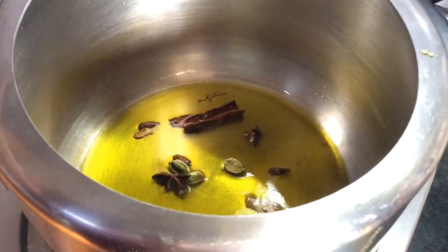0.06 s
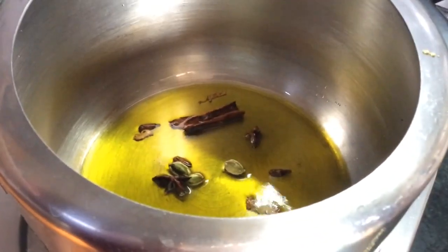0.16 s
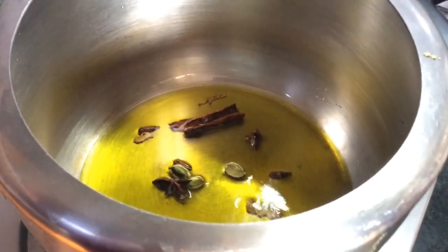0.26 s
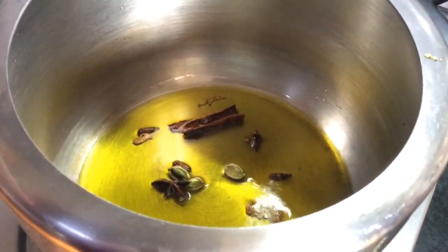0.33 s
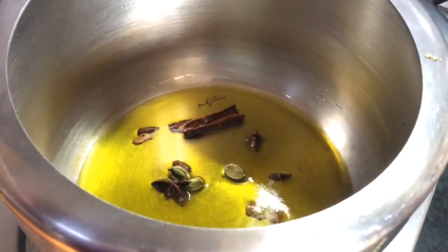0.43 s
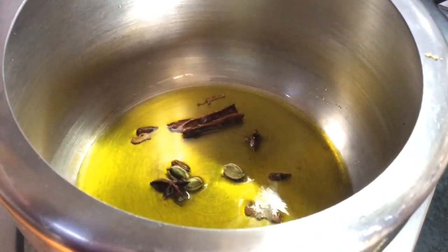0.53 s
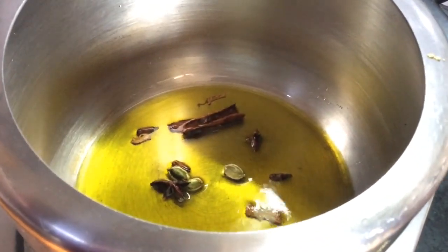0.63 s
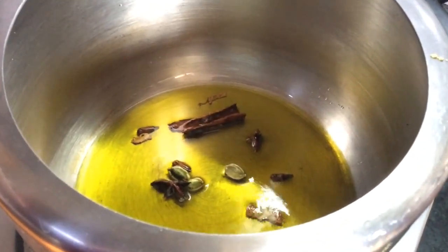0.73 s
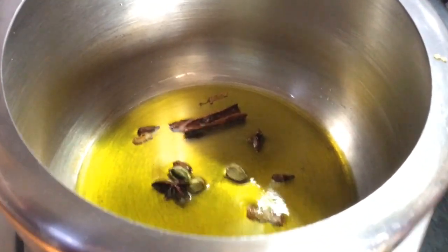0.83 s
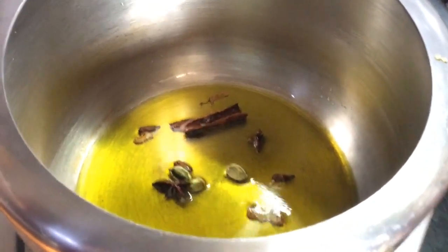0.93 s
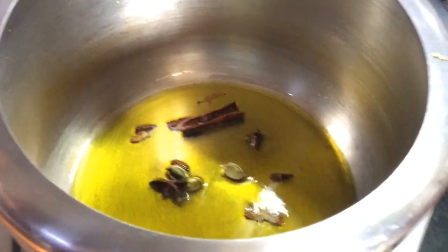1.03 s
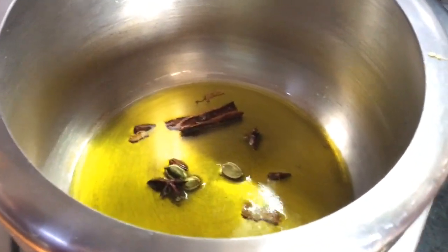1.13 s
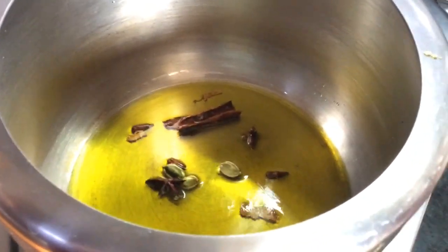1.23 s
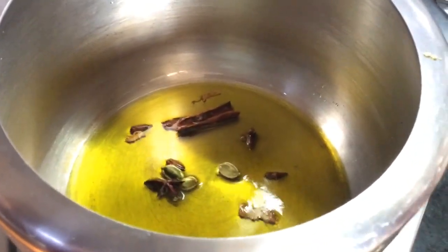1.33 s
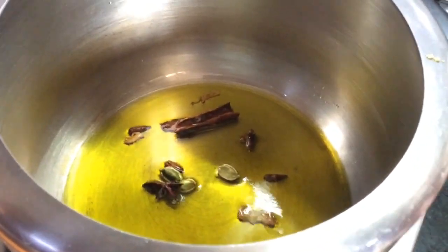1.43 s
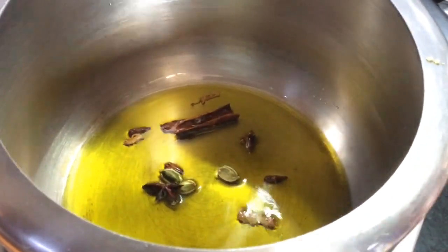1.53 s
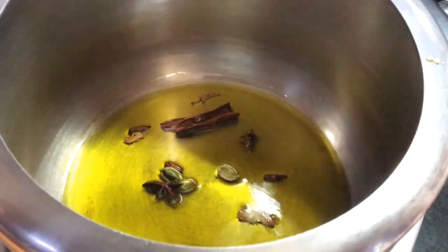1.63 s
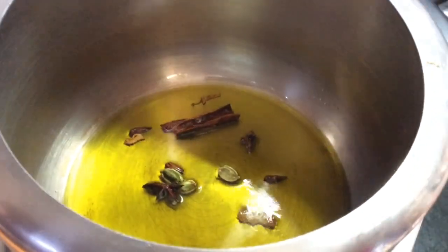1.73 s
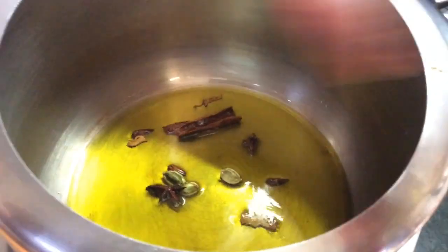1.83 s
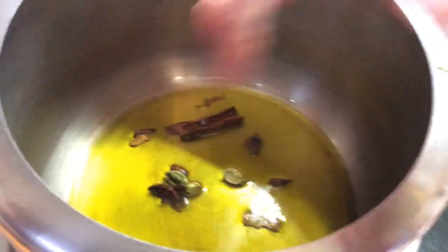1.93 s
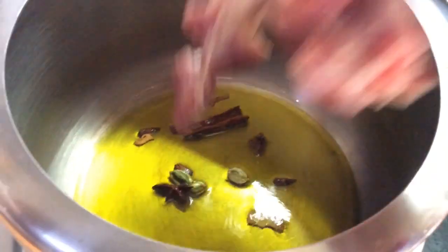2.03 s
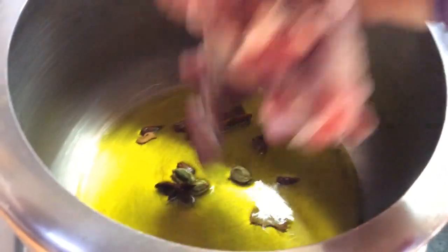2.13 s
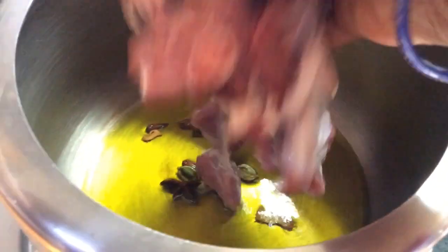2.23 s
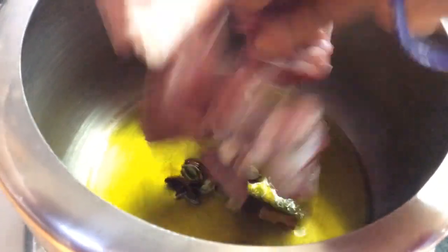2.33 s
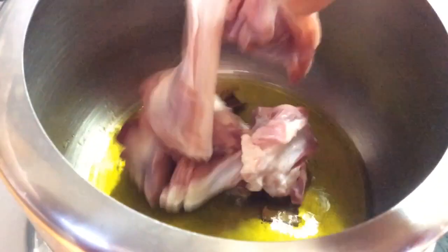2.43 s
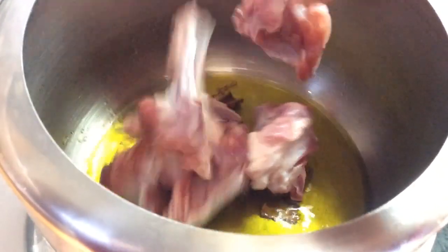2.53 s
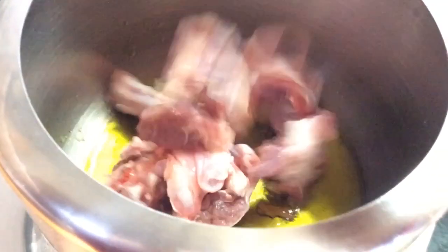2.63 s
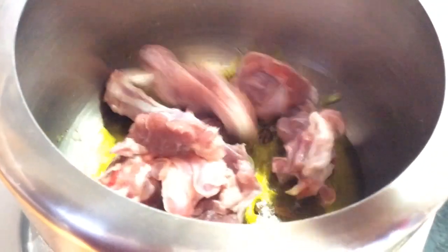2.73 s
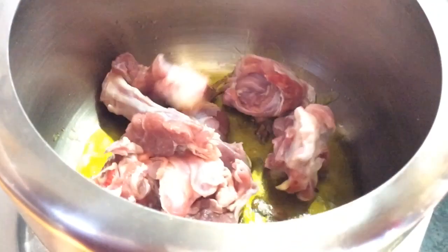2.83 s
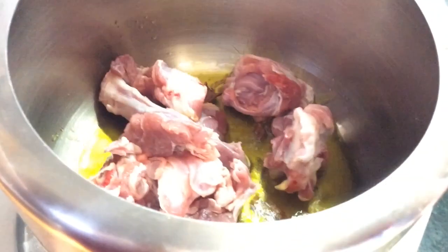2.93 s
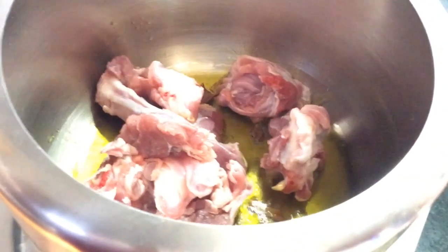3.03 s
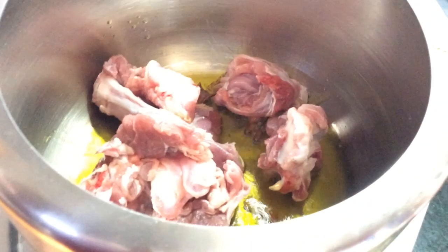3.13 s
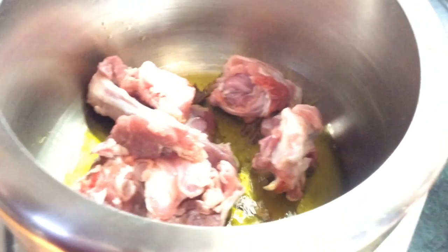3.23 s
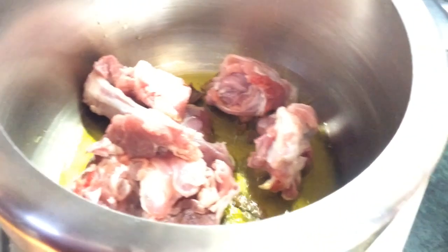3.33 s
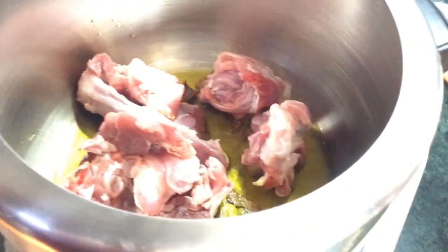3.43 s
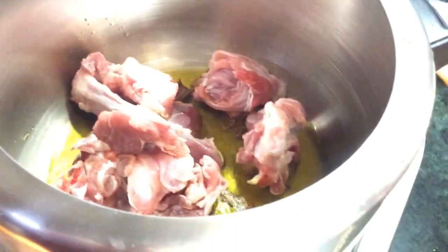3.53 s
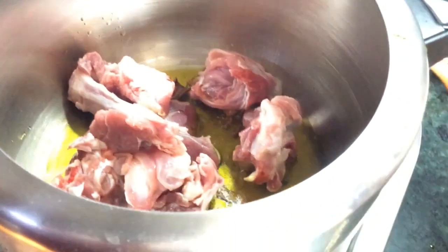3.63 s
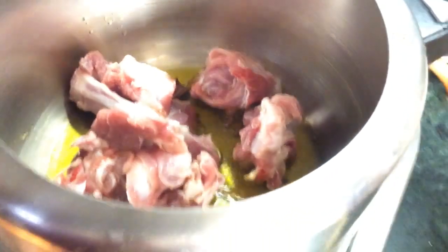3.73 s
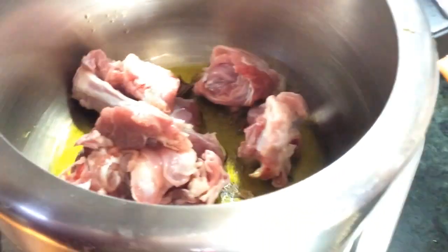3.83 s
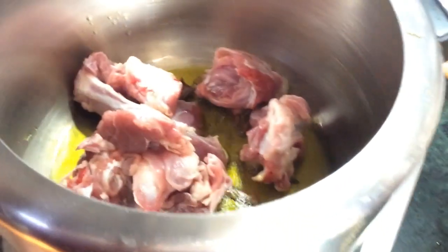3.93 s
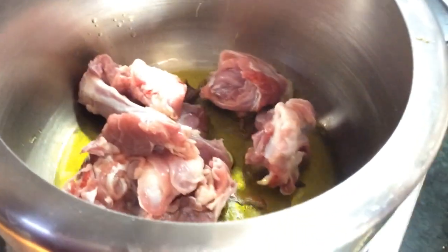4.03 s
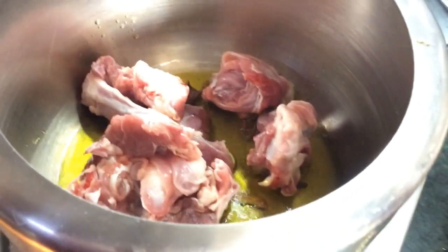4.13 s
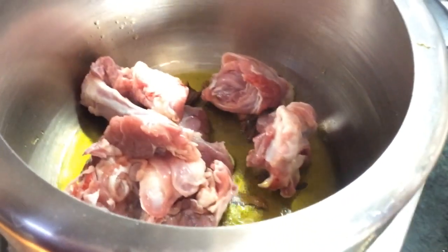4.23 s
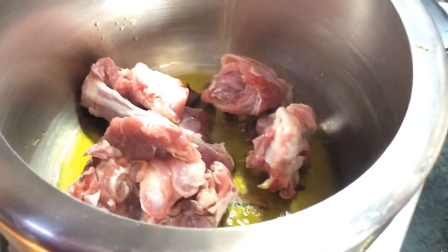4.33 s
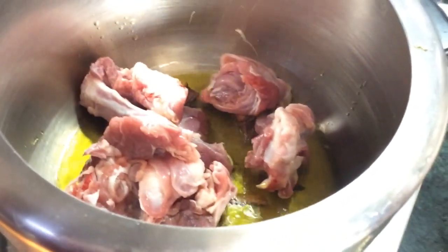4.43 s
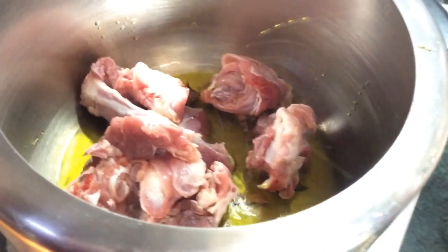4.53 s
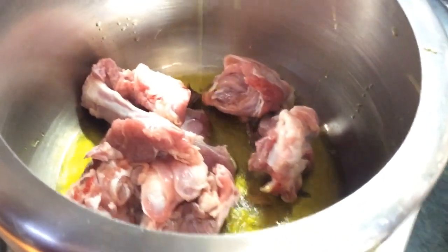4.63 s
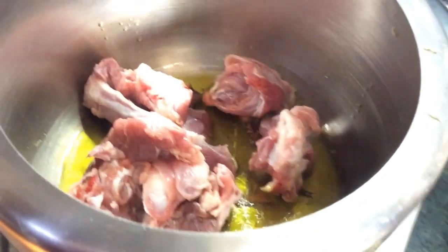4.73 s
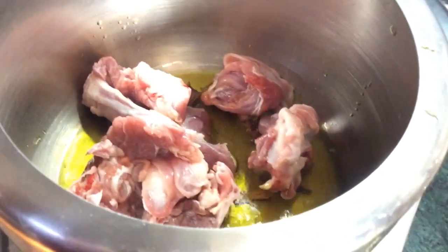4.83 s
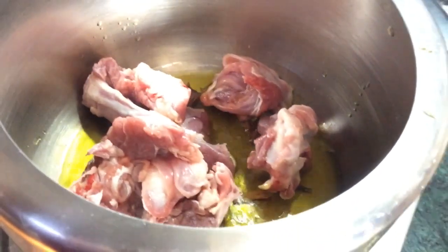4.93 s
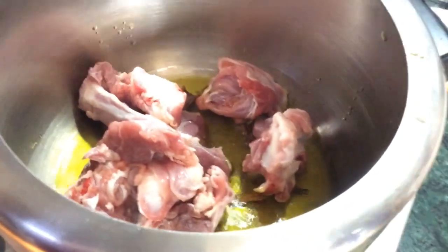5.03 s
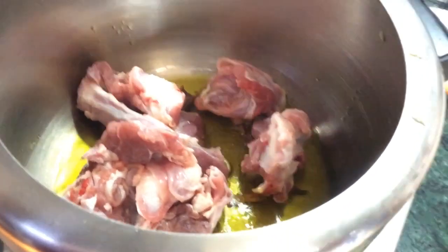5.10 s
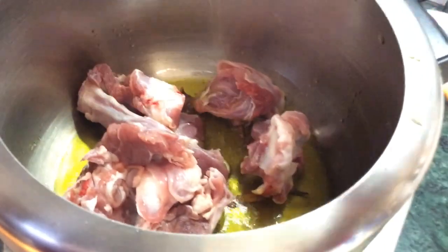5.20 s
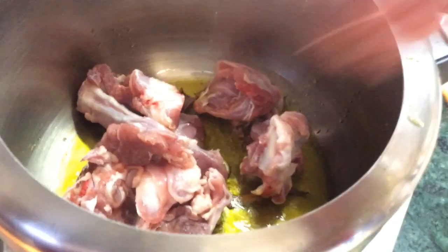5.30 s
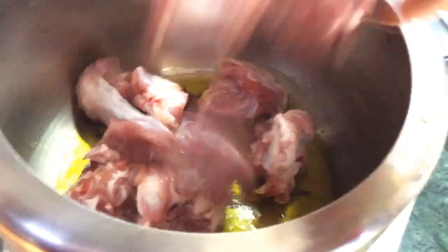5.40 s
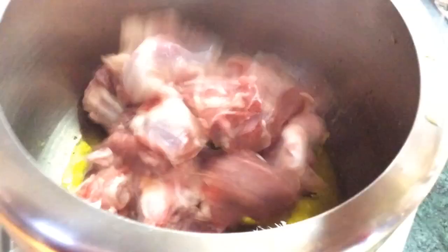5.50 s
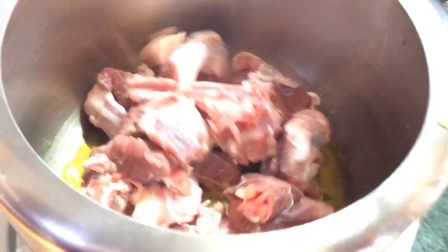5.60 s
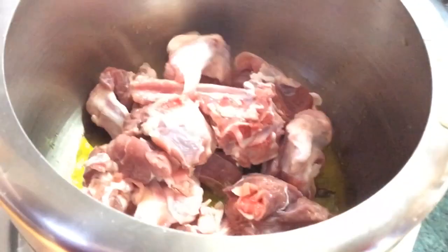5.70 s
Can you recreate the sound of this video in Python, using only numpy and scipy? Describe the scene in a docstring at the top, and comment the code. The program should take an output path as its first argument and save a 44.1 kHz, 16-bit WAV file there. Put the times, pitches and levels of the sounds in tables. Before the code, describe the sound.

Very close mono microphone over a pressure cooker: over two seconds of faint simmer, tiny ticks and low room rumble, one bright bangle clink, then meat plops in with a steamy, fizzy roar. The sizzle eases slightly while sharp oil pops grow more frequent and distort; more meat stirs it up again.

```python
"""Raw meat drops into hot oil in an open pressure cooker, close to the microphone. The wet meat lands and its
water flashes to steam: swarms of short ringing bubbles make a dense sizzle, with crackles and loud pops that
ring in the pot, and hissing jets; together they overload the microphone. Before that, whole spices tick in the
oil and a bangle clinks as a set of fading sines. Behind it all, filtered noise and a wavering low hum make the
kitchen."""
import sys
import numpy as np
from scipy import signal
from scipy.fft import rfft, irfft
from scipy.io import wavfile
from scipy.ndimage import uniform_filter1d

SR = 44100
rng = np.random.default_rng(int(sys.argv[2]) if len(sys.argv) > 2 else 0)


def bounce(signal):
    """Save signal as a 16-bit WAV file at the path given by the first command-line argument."""
    frames = np.transpose(np.atleast_2d(signal))
    limited = np.clip(frames, -1, 1)
    pcm = np.round(limited * 32767).astype(np.int16)
    wavfile.write(sys.argv[1], SR, pcm)


N = 254016
TIME = np.arange(N) / SR  # [s]

# wet meat hitting the pot floor, levels before the meat gain in scene():
# (time [s], thump level [dB], thump pitch [Hz], level of the gush of bubbles [dB])
MEAT_LANDINGS = [(2.4478, -16, 270, -27), (2.675, -8.5, 350, -36), (2.762, -20, 396, -24),
                 (5.58, -35, 400, -17.5), (5.6555, -10.5, 334, -31)]
# colour of the tiny bubbles and droplets: (frequency [Hz], relative level per Hz [dB])
FIZZ_COLOUR = [(300, -28), (1100, -7), (2000, 0.5), (3300, 2.5), (4300, -1.5), (5500, 0.5), (7000, -5),
               (9000, -10.5), (11000, -20.5), (13000, -29), (16000, -47)]
# colour of the middle-sized bubbles: (frequency [Hz], relative level per Hz [dB])
CRACKLE_COLOUR = [(200, -46.5), (450, -1.5), (800, -18.5), (1150, -1), (1400, -10), (1800, 4), (2300, -2),
                  (3000, -5.5), (4200, -2), (6500, -68), (12000, -53)]


def amp(db):
    """Turns decibels into a gain."""
    return 10 ** (np.asarray(db) / 20)


def evened(x):
    """Scales a sound to an average (rms) strength of 1."""
    return x / np.sqrt(np.mean(x ** 2) + 1e-20)


def add(mix, start_s, sound):
    """Mixes a sound in at the given time, in place."""
    part = mix[max(round(start_s * SR), 0):][:len(sound)]
    part += sound[:len(part)]


def colour(x, points, size=4096):
    """Gives a sound the listed spectrum; the filter never looks ahead, so clicks keep sharp fronts."""
    hz, db = np.transpose(points)
    bin_hz = abs(np.fft.fftfreq(size, 1 / SR)) + 1
    log_gain = np.log(amp(np.interp(np.log(bin_hz), np.log(hz), db)))
    # this phase packs the filter's energy as early as possible
    taps = np.fft.ifft(np.exp(np.conj(signal.hilbert(log_gain)))).real
    return signal.oaconvolve(x, taps[:size // 2])[:N]


def low_cut(x, hz):
    """Takes out the bass, as a small source radiates little of it."""
    return signal.sosfilt(signal.butter(2, hz, "high", fs=SR, output="sos"), x)


def ring(hz, fade_s, rise_s=1e-5):
    """A sine that swells and dies away; both times are time constants."""
    t = TIME[:int(8 * fade_s * SR) + 2]
    return np.sin(2 * np.pi * hz * t) * np.exp(-t / fade_s) * (1 - np.exp(-t / rise_s))


def wander(hz):
    """A random curve of rms 1 that wavers at rates from a tenth of hz to about hz."""
    f = np.fft.rfftfreq(N, 1 / SR)
    weights = (f > hz / 10) / (1 + (f / hz) ** 2)
    return evened(irfft(rfft(rng.standard_normal(N)) * weights, N))


def bursts(per_s, spread_db, clump_db, clump_hz):
    """Random clicks, mostly small and a few large, whose strength rises and falls in clumps."""
    sizes = amp(spread_db * np.minimum(rng.exponential(1, N), np.pi))
    clicks = sizes * rng.choice([-1, 1], N) * (rng.random(N) < per_s / SR)
    return evened(clicks * amp(clump_db * np.tanh(wander(clump_hz))))


def bubbles(per_s, spread_db, clump_db, low_hz, high_hz, cycles, count=20):
    """Swarms of bubbles in many sizes, each ringing a few cycles at its own pitch."""
    out = np.zeros(N)
    for hz in np.geomspace(low_hz, high_hz, count):
        bubble = ring(hz, cycles / hz, 0.12 / hz)
        clicks = bursts(per_s / count, spread_db, clump_db, 26)
        out += np.sqrt(hz) * evened(signal.oaconvolve(clicks, bubble)[:N])
    return evened(out)


def echoes(t60, first_s):
    """Sparse reflections of random sign that fall 60 dB in t60 seconds; energy 1."""
    t = TIME[:SR // 2]
    hits = rng.choice([-1, 1], len(t)) * (rng.random(len(t)) < 1 / 10)
    taps = hits * (t > first_s) * 1000 ** (-t / t60)
    taps = signal.lfilter(*signal.butter(1, [300, 7000], "band", fs=SR), taps)
    return taps / np.linalg.norm(taps)


def pot(x, wall_db, mode_db):
    """Sound bounces between the steel walls, rings the pot and spills into the kitchen."""
    # resonances of the pot and the air in it; mode_db is added to each level:
    # (pitch [Hz], time to fall 60 dB [s], level [dB])
    resonances = [(446, 0.18, -20.5), (514.5, 0.02, -14), (830, 0.35, -29), (1131.7, 0.074, -10.5),
                  (1163, 0.083, -15.5), (1874, 0.034, -38.5), (2076, 0.017, -17), (2370, 0.062, -60),
                  (3700, 0.066, -47.5)]
    out = x + amp(wall_db - 8.5) * signal.oaconvolve(x, echoes(0.22, 0.019))[:N]  # the kitchen
    # bubbles burst all over the pot floor, and each of five places has its own wall echoes
    for angle in np.linspace(0, np.pi, num=5, endpoint=False):
        # the places take turns; the root keeps their total power at 1
        share = np.cos(2 * np.pi * 11 * TIME + angle) ** 4 / np.sqrt(175 / 128)
        out += amp(wall_db) * signal.oaconvolve(share * x, echoes(0.062, 0.001163))[:N]
    body = np.zeros(SR // 2)
    for hz, t60, db in resonances:
        mode = ring(hz, t60 / np.log(1000), 0.0035)
        add(body, 0, amp(db + mode_db) * mode / np.linalg.norm(mode))
    return out + signal.oaconvolve(x, body)[:N]


def sizzle():
    """Water boils off the meat: tiny bubbles fizz, larger ones crackle, trapped ones knock on the floor."""
    # how hard the water boils, strongest soon after the first pieces land: (time [s], level [dB])
    boil_curve = [(2.32, -51), (2.41, -40.5), (2.47, -35), (2.76, -26.5), (2.97, -25), (3.28, -28),
                  (3.69, -33), (4.06, -30), (4.45, -33.5), (4.87, -30), (5.43, -34.5), (5.63, -29),
                  (5.76, -32.5)]
    # colour of the bubbles trapped under the meat: (frequency [Hz], relative level per Hz [dB])
    knock_colour = [(40, -29), (200, -51), (320, -3.5), (460, 3), (650, -4), (900, -5), (1500, -9),
                    (4000, -34)]
    wet_from_s, wet_rise_s = 2.315, 0.017  # first touch of meat and oil, time to catch
    first_contact, spread_s = 0.13, 0.025  # share in the oil before landing, time constant of spreading
    stir_boost_db, stir_s = 6.5, 0.03  # each landing stirs up the larger bubbles: boost, time constant
    steady_boil_db = -32
    crackle_db, crackle_follows = -29, 0.39  # level at a steady boil, share of the boil's swing
    knock_db, knock_follows = -41.5, 0.61
    knock_growth_db_per_s = 1.85  # bubbles trapped under the meat grow as it heats

    boil_db = np.interp(TIME, *np.transpose(boil_curve))
    swing_db = boil_db - steady_boil_db
    landed_s = np.maximum(TIME - MEAT_LANDINGS[0][0], 0)
    contact = 1 - (1 - first_contact) * np.exp(-landed_s / spread_s)
    stir_db = stir_boost_db * sum((TIME > s) * np.exp(-abs(TIME - s) / stir_s) for s, *_ in MEAT_LANDINGS)
    crackle_gain = contact * amp(crackle_db + crackle_follows * swing_db + 0.87 * stir_db)
    growth_db = knock_growth_db_per_s * landed_s
    knock_gain = contact * amp(knock_db + knock_follows * swing_db + growth_db + stir_db)

    tiny = bubbles(4200, 4.2, 3.5, 1500, 15000, 1.7, count=28)
    fizz = evened(colour(tiny, FIZZ_COLOUR)) * amp(0.73 * wander(120))
    ticks = colour(bursts(150, 5.6, 8.5, 16), CRACKLE_COLOUR)  # the odd film that tears with a dry tick
    larger = bubbles(1100, 3.9, 6.8, 1150, 6030, 1.7)
    crackle = evened(colour(larger, CRACKLE_COLOUR)) * amp(1.43 * wander(59))
    crackle += amp(-3.5) * evened(ticks)
    knocks = colour(bursts(150, 3.7, 2.6, 25), knock_colour)

    out = amp(boil_db + 3.0) * evened(pot(fizz, -5.5, -31))  # the fizz is 3 dB above the boil curve
    out += crackle_gain * evened(pot(crackle, -11.5, -11))
    out += knock_gain * evened(pot(knocks, -13, -32.5))
    return low_cut(out, 270) * np.clip((TIME - wet_from_s) / wet_rise_s, 0, 1)


def pops():
    """Each large bubble snaps, rings, pushes on the pot floor and throws a brief spray of droplets."""
    # the loud steam bubbles, levels before the gains below and in scene():
    # (time [s], bubble pitch [Hz], ring time constant [s], bubble level [dB],
    #  level of the film's snap [dB], level of the thud on the pot floor [dB])
    loud_pops = [(2.448, 1304, 0.0034, -4, -16.5, -14.5), (2.5625, 2880, .003, -12, -11, -34),
                 (2.7741, 1904, 0.0026, -6, -18, -40), (2.7935, 1780, .0036, -7.5, -7.5, -7.5),
                 (2.819, 1800, .0007, 3, -15, -36), (2.8656, 1870, 0.0041, -7.5, -11, -35),
                 (3.0235, 1920, 0.0017, -8, -22, -17), (3.0938, 1830, 0.002, -3, -5, -39),
                 (3.1311, 2760, 0.00024, 10, -10, -15), (3.159, 3640, .0004, -7, 1, -12),
                 (3.2029, 1540, 0.00063, -4.5, -29, -4.5), (3.4157, 1910, 0.0021, 1, -2, -15),
                 (3.4929, 1854, 0.00093, 6, -8.5, -9), (3.5948, 1880, 0.00087, -0.5, -3, -9.5),
                 (3.658, 2950, 0.0018, -6.5, -3, -34), (3.8867, 5430, 0.00065, 2.5, 2.5, -17.5),
                 (4.014, 3580, 0.00055, -8, -15, -6.5), (4.026, 1890, 0.0016, -4.5, -16, -26),
                 (4.0404, 1870, 0.001, 1.5, -17, -37), (4.056, 5300, .0003, 4, 2, -14),
                 (4.1052, 4000, .00035, 3.5, -23, -32), (4.156, 2590, 0.0012, -0.5, -24, -39),
                 (4.2124, 1790, .003, -11.5, -11, -10), (4.348, 2020, 0.00053, 8, 4, -11.5),
                 (4.387, 1790, .0018, 5.5, -5, -12), (4.4114, 1840, 0.00055, 3.5, -20, 0),
                 (4.4182, 1830, 0.0015, 0, -21, -5.5), (4.5021, 3770, .0004, 1, -4, -12),
                 (4.5436, 1810, 0.0005, 11, -2.5, 1.5), (4.5538, 2720, 0.00026, 16, -1, -31),
                 (4.6072, 2830, 0.00038, 4, -14, -5.5), (4.701, 4090, 0.00027, 16.5, -6.5, -35),
                 (4.7427, 2530, 0.0014, -3, -11.5, -40), (4.8136, 1940, .0004, -14, -10, -6.5),
                 (4.9171, 3720, .0006, 6, 1, -7.5), (4.9406, 3030, .0012, 0.5, -13, -6),
                 (5.0036, 2140, 0.00037, 6.5, -10, -27), (5.02, 2330, 0.0021, -6, -13, -18),
                 (5.0443, 1630, 0.0018, -6.5, -11, -6), (5.0497, 1170, 0.0012, -4.5, -3, -7),
                 (5.0739, 1970, .0008, -0.5, -8, -17.5), (5.196, 2660, 0.0021, -4.5, -7, -19),
                 (5.2149, 2340, 0.00057, 12, -15, -13), (5.2853, 1750, 0.00025, 14.5, -2.5, -2.5),
                 (5.33, 3600, 0.00027, 8.5, -3, -0.5), (5.367, 2780, 0.0013, -4.5, -9, -18),
                 (5.3816, 5460, 0.00037, -0.5, -6.5, -7.5), (5.3947, 2020, 0.0008, 2.5, -12, -24),
                 (5.4084, 1810, .0017, -7.5, -26, -23), (5.4669, 2770, 0.0018, -9.5, -27, -15),
                 (5.5234, 1920, 0.0011, 6, -18, -5.5), (5.5839, 1790, 0.0046, -5.5, -21, -3.5),
                 (5.6179, 1800, 0.00045, 10, -11, -9), (5.6568, 1540, 0.00056, 7.5, -7, 0.5),
                 (5.6929, 2140, 0.0019, 0, -14, -38)]
    out, thuds, spray = np.zeros((3, N))
    chances = rng.uniform(-1, 1, (200, 2))  # each pop's own snap and thud pitch
    for row, (snap_chance, thud_chance) in zip(list(loud_pops) + small_pops(), chances):
        s, hz, fade_s, bubble_db, snap_db, thud_db = row
        snap_hz = 4600 * (1 + 0.19 * snap_chance)
        thud_hz = 590 * (1 + 0.11 * thud_chance)
        add(out, s, -amp(bubble_db) * ring(hz, fade_s, 0.00026))
        add(out, s, -amp(snap_db + 3.0) * ring(snap_hz, 0.00037, 0.0001))
        add(out, s, -amp(snap_db - 13) * ring(9700, 0.00009))  # the sharp edge of the snap
        add(thuds, s, -amp(thud_db - 1.0) * ring(thud_hz, 0.0012, 0.0001))
        add(spray, s, amp(snap_db) * np.exp(-TIME[:SR // 10] / 0.0095))
    droplets = amp(-19.5) * spray * evened(colour(bursts(2500, 2.6, 3.0, 87), FIZZ_COLOUR))
    return pot(low_cut(out + low_cut(thuds, 470) + droplets, 140), -9.5, -4.0)


def small_pops(count=120):
    """Smaller bubbles burst at random, more often once the meat has settled; rows as in loud_pops."""
    slots_per_s, from_s, settle_s = 17, 2.5, 1.2  # chances to pop, first chance, time constant of settling
    middle_hz, spread_octaves, ring_cycles = 2520, 0.57, 2.3  # spread each way; cycles per time constant
    bubble_db, snap_db, thud_db, spread_db = -7, -16, -19.5, 2.5
    rows = []
    for k, (when, keep, *chances) in enumerate(rng.random((count, 6))):
        s = from_s + (k + when) / slots_per_s
        size, bubble, snap, thud = 2 * np.array(chances) - 1
        hz = middle_hz * 2 ** (-spread_octaves * size)  # larger bubbles ring lower
        if s < TIME[-1] and keep > np.exp((from_s - s) / settle_s):
            rows.append((s, hz, ring_cycles / hz, bubble_db + spread_db * bubble,
                         snap_db + spread_db * snap, thud_db + 2 * spread_db * thud))
    return rows


def landings():
    """Soft meat gives a dull push on the pot floor, and its wet side boils up at once."""
    thumps, gush = np.zeros((2, N))
    for s, thump_db, hz, gush_db in MEAT_LANDINGS:
        add(thumps, s, amp(thump_db) * ring(hz, 0.0019, 0.00088))
        add(gush, s, amp(gush_db) * np.exp(-TIME / 0.062) * (1 - np.exp(-TIME / 0.00081)))
    foam = evened(colour(bubbles(6000, 1.4, 2, 1230, 6300, 2.1, count=12), CRACKLE_COLOUR))
    return pot(low_cut(thumps, 64) + gush * foam, -4.5, -5.5)


def steam_jet():
    """Steam forced through a wet gap sings a fuzzy, wide note that swells and fades."""
    # steam squeezed from under the first pieces, levels before the meat gain:
    # (start [s], length [s], pitch [Hz], level [dB])
    jets = [(2.387, 0.031, 4900, -34), (2.46, 0.13, 3296, -24.5), (2.58, 0.32, 3446, -28)]
    out = np.zeros(N)
    for s, length_s, hz, db in jets:
        swell = np.sin(np.pi * np.clip((TIME - s) / length_s, 0, 1))
        out += amp(db) * swell * wander(300) * np.sqrt(2) * np.cos(2 * np.pi * hz * TIME)
    return out


def spices():
    """Whole spices simmer faintly and spit now and then; the pot pings once."""
    # spices spitting in the oil: (time [s], level [dB], time constant [s])
    spits = [(0, -59, 0.061), (1.023, -59.5, 0.053), (1.572, -62.5, 0.026), (2.046, -58, 0.051)]
    # colour of the simmer: (frequency [Hz], relative level per Hz [dB])
    spice_colour = [(500, -11), (1200, -1.5), (2200, -4.5), (4000, -4), (7000, -13), (10000, -10),
                    (14000, -25)]
    # a faint ring of the pot: (pitch [Hz], time constant [s], level [dB])
    ping = (1255, 0.069, -54.5)
    level = np.full(N, amp(-69))  # the steady simmer
    for s, db, fade_s in spits:
        add(level, s, amp(db) * np.exp(-TIME / fade_s))
    simmer = colour(bubbles(1500, 2.5, 2.2, 1190, 7200, 0.66), spice_colour)
    out = level * evened(pot(simmer, -2, -33))
    hz, fade_s, ping_db = ping
    add(out, 0.98, amp(ping_db) * ring(hz, fade_s, 0.0067))
    return out


def spice_ticks():
    """Single tiny bubbles burst on the spices, each a very short ring."""
    # ticks before the meat goes in: (time [s], pitch [Hz], level [dB])
    ticks = [(0.087, 2830, -34), (0.4786, 2290, -37), (0.6043, 2180, -35), (0.622, 2960, -38),
             (0.718, 3740, -34), (1.1053, 2570, -40), (1.2273, 2630, -38.5), (2.177, 2270, -28),
             (2.208, 2230, -33)]
    out = np.zeros(N)
    for s, hz, db in ticks:
        add(out, s, amp(db) * ring(hz, 0.00035, 0.00018))
    return pot(low_cut(out, 600), -9, -16)


def bangle():
    """A bangle clinks as the hand brings the meat: each knock rings all its pitches at once."""
    # the bangle's own pitches: (pitch [Hz], level [dB], time to fall 60 dB [s])
    bangle_modes = [(2400, -32, 0.75), (4604, 2, 0.045), (4630, -13.5, 0.23), (4760, -20, 0.061),
                    (7560, -21, 0.14), (10400, -21, 0.054), (10800, -23, 0.092), (12780, -29, 0.1),
                    (15100, -35, .15)]
    # its clinks: (time [s], level [dB])
    clinks = [(1.8992, -30.5), (1.98, -50)]
    strikes, body = np.zeros(N), np.zeros(SR)
    for s, db in clinks:
        add(strikes, s, amp([db]))
    for hz, db, t60 in bangle_modes:
        add(body, 0, amp(db) * ring(hz, t60 / np.log(1000), 0.000082))
    add(body, 0, amp(9.0) * ring(1900, 0.0001))  # the tick of contact
    out = signal.oaconvolve(strikes, body)[:N]
    return out + amp(-6) * signal.oaconvolve(out, echoes(0.15, 0.004))[:N]


def kitchen():
    """Steady room rumble from filtered noise, with a low hum that wavers in pitch and level."""
    # colour of the room noise: (frequency [Hz], relative level per Hz [dB])
    room_colour = [(12, -50), (20, -25.5), (84, 0), (270, -19.5), (328, -12.5), (409, -21), (540, -18.5),
                   (587, -21.5), (796, -24), (1080, -33.5), (1510, -36.5), (1640, -28), (2280, -36.5),
                   (7930, -37.5), (15000, -56)]
    hum_hz, hum_db, room_db = 81.6, -73, -55
    hum = np.sqrt(2) * np.sin(2 * np.pi * hum_hz * TIME + 0.83 * wander(4))
    hum *= amp(hum_db + 2 * wander(2.8))
    return hum + amp(room_db) * evened(colour(rng.standard_normal(N), room_colour))


def scene():
    """Everything heard above the pot."""
    meat_gain_db = 6  # the frying meat against the quiet kitchen
    frying = amp(meat_gain_db) * (sizzle() + steam_jet() + pops() + landings())
    return (frying + spices() + spice_ticks() + bangle() + kitchen())[None]  # one microphone


def record(dry):
    """Gain control turns loud stretches down, the loudest peaks still clip; then the top treble is cut."""
    duck_above_db, duck_most_db, recover_db_per_s = -30, 6, 3
    power_db = 10 * np.log10(abs(uniform_filter1d(dry[0] ** 2, size=2048)) + 1e-12)
    over_db = np.clip(power_db - duck_above_db, 0, duck_most_db)
    # the gain drops along with each rise in level, but comes back slowly
    recovery_db = recover_db_per_s * TIME
    duck_db = np.maximum.accumulate(over_db + recovery_db) - recovery_db
    clipped = np.clip(dry * amp(-duck_db), -1, 1)
    treble_cut = signal.firwin(255, 16000, window=("kaiser", 8), fs=SR)
    return signal.oaconvolve(clipped, treble_cut[None], "same")


dry = scene()
out = record(dry)
bounce(out)
```